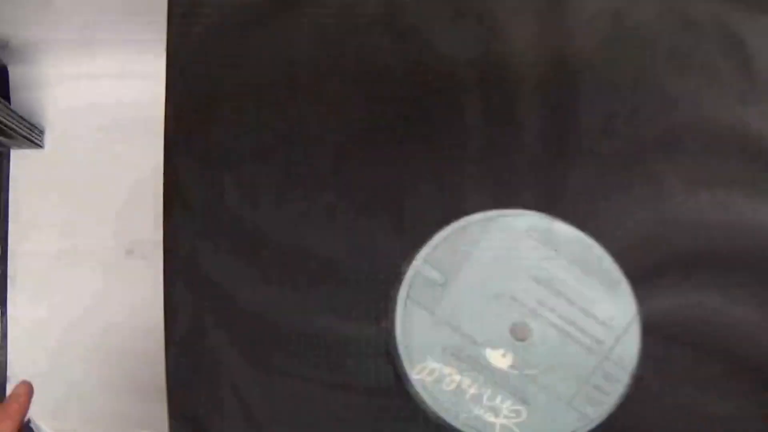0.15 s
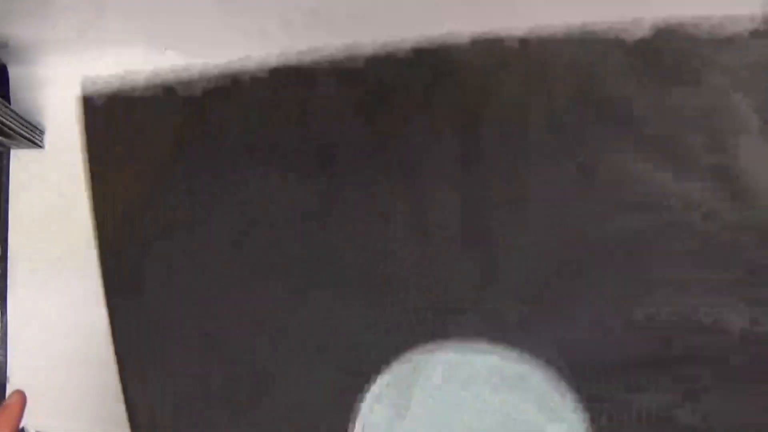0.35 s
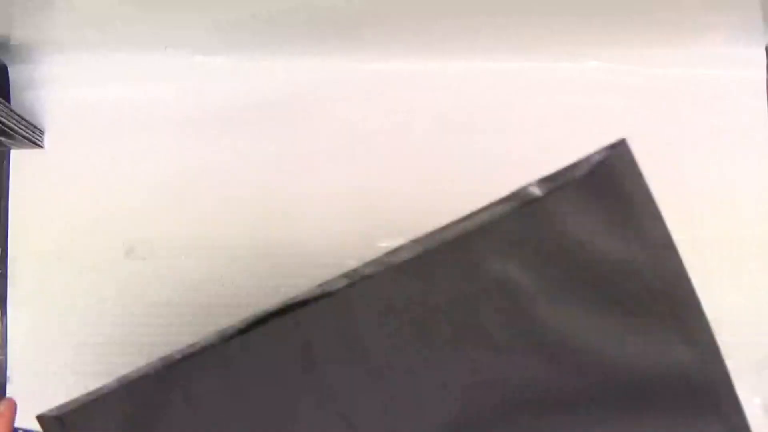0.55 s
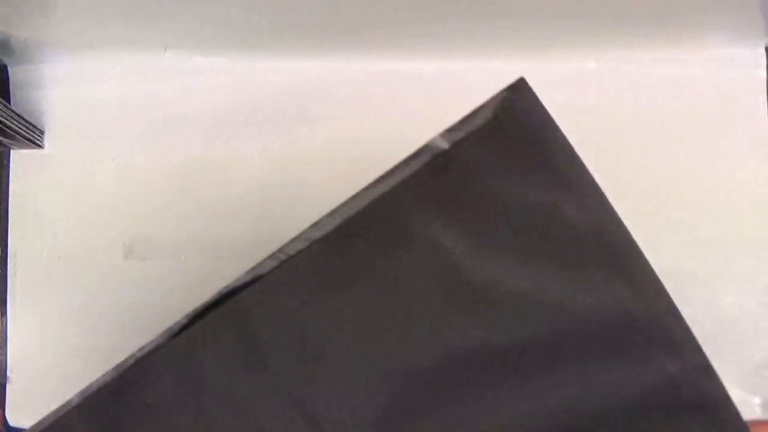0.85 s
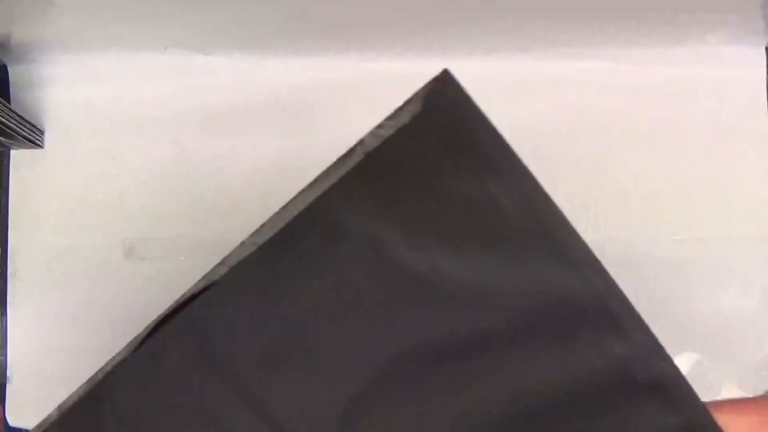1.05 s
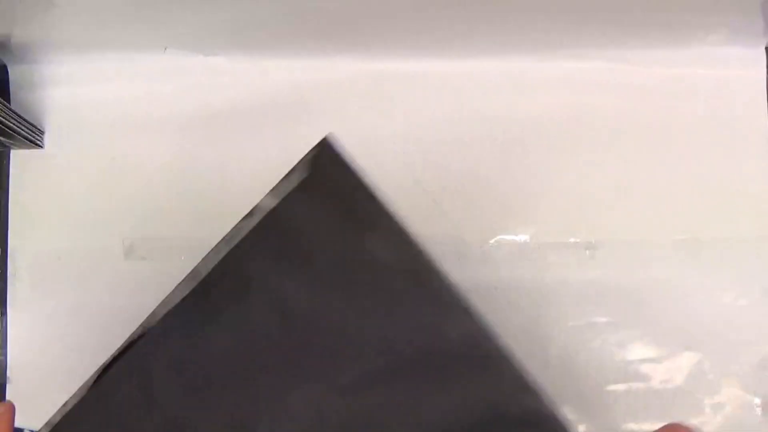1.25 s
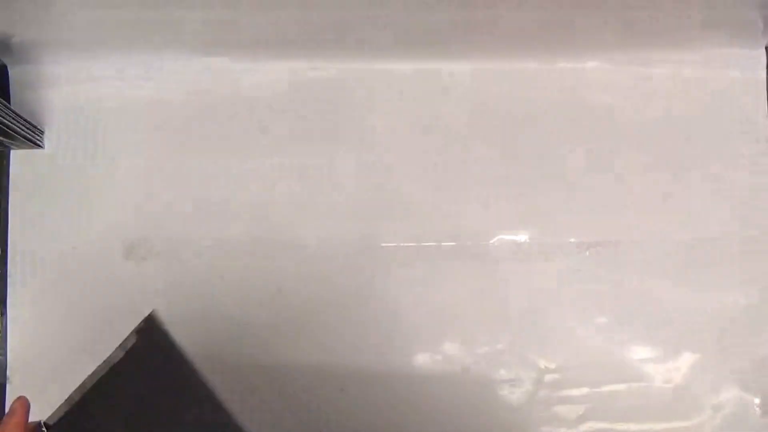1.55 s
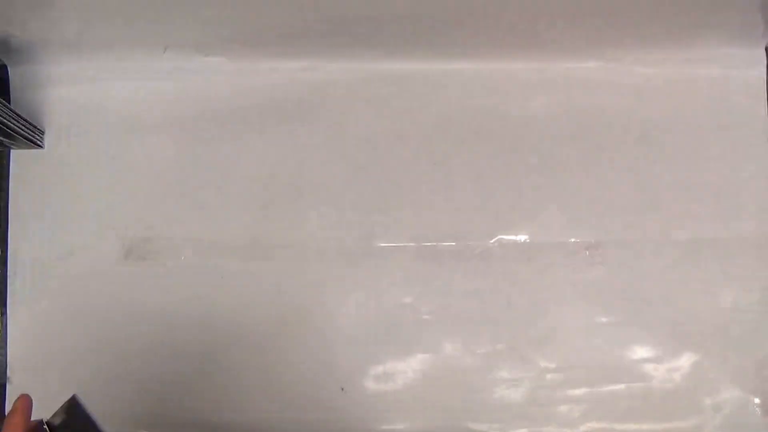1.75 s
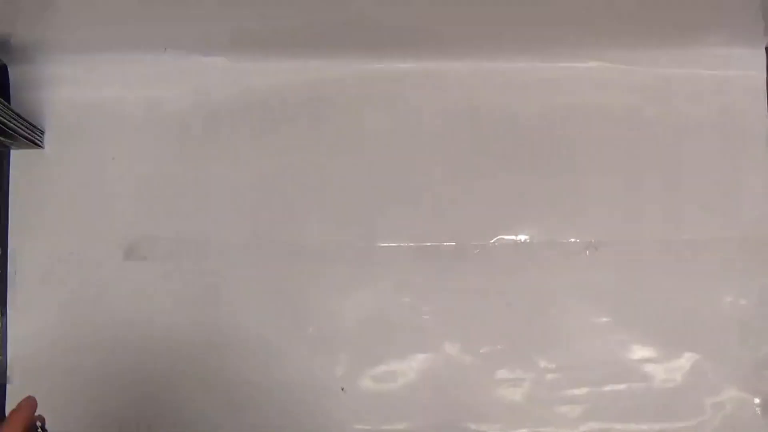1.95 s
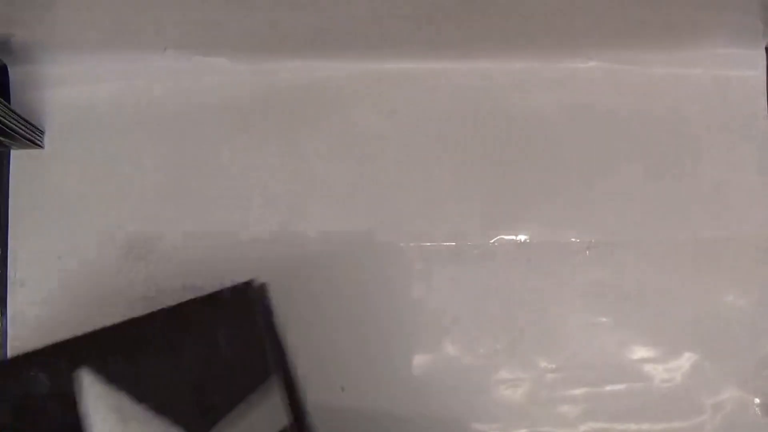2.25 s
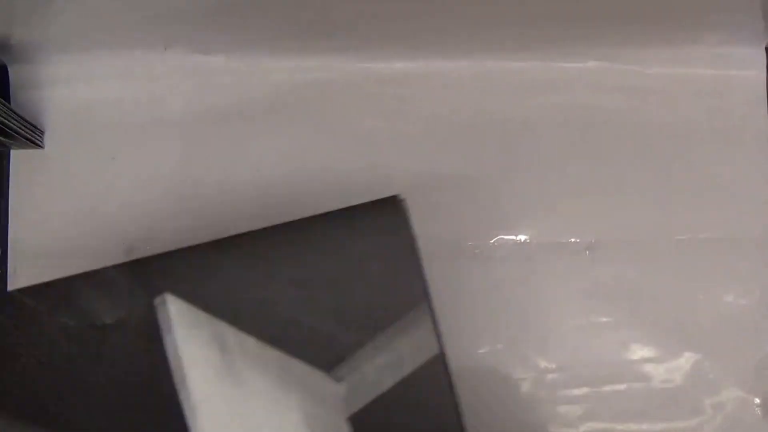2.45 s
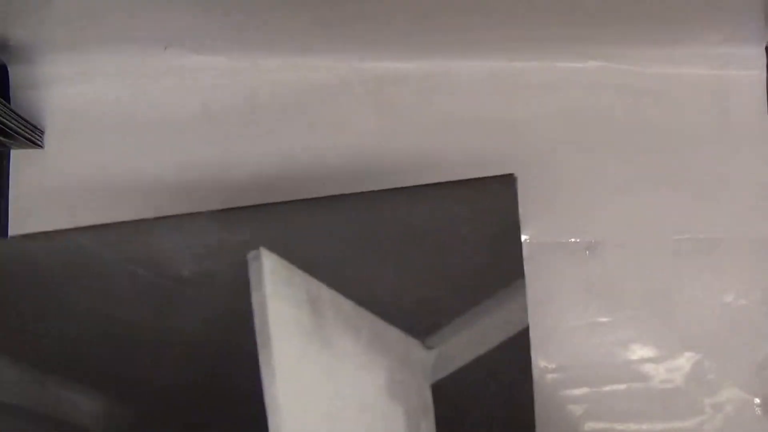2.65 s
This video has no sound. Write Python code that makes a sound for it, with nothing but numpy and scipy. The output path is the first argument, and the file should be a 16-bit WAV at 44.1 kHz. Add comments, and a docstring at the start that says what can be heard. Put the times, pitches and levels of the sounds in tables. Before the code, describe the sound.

Cardboard record sleeves handled close up in a small quiet room. A soft hollow bump and low puff of air at 0.25-0.4 s, a sharp knock with brief scuffing at 0.6 s, a dull thud near 0.75, a crisp tap at 1.05. A bright, grainy papery slide runs 1.3-1.95 s, then light taps at 2.1, 2.4 and 2.5 s fade into faint hum, hiss and tiny rapid ticking.

```python
"""Cardboard sleeves turned and slid over a table, close up: dense fibre grains ring paper, card and sleeve bands.
Scuffs are narrow noise swells; edge taps mix noise bursts with a ring; thuds are decaying low modes.
The rubbing, scuffs, taps and thuds get a short wide echo; fanned air is low noise with a slow level curve.
Beneath lie mains hum, rumble, hiss and a faint pip 25 times a second, in a quiet room."""
import sys
import numpy as np
from scipy import signal
from scipy.fft import rfft, irfft
from scipy.io import wavfile
from scipy.ndimage import uniform_filter1d, map_coordinates

SR = 44100
rng = np.random.default_rng(int(sys.argv[2]) if len(sys.argv) > 2 else 0)


def generate_wav(sig):
    """Save sig (samples, or channels by samples) to the path in sys.argv[1] as 16-bit PCM at SR."""
    pcm = np.round(np.clip(np.atleast_2d(sig).T, -1, 1) * 32767).astype(np.int16)
    wavfile.write(sys.argv[1], SR, pcm)


N = 123479


def undb(db):
    """dB to gain."""
    return 10 ** (np.asarray(db) / 20)


def unit(x):
    """Scale to rms 1."""
    return x / np.sqrt(np.mean(x ** 2))


def band(x, hz, width_hz):
    """Two-pole resonance, gain 1 at the centre."""
    b, a = signal.iirpeak(min(hz, .45 * SR), hz / width_hz, fs=SR)
    return signal.lfilter(b, a, x)


def highpass(x, hz):
    """Second-order high-pass."""
    return signal.sosfilt(signal.butter(2, hz, "high", fs=SR, output="sos"), x)


def walk(rate_hz):
    """Random levels held 1 / rate_hz s, smoothed twice; rms 1."""
    hold = int(SR / rate_hz)
    steps = np.repeat(rng.standard_normal(N // hold + 1), hold)
    slewed = uniform_filter1d(uniform_filter1d(steps, hold), hold)
    return unit(slewed[:N])


def log_interp(hz, points):
    """dB at hz from (f/Hz, dB) points, linear in log f."""
    return np.interp(np.log(hz), np.log(points[:, 0]), points[:, 1])


def coloured(points):
    """Gaussian noise shaped to (f/Hz, dB) points."""
    hz = np.maximum(np.arange(N // 2 + 1) * SR / N, 1)
    spectrum = rfft(rng.standard_normal(N)) * undb(log_interp(hz, points))
    return irfft(spectrum, N)


def add(out, x, start_s):
    """Mix x into out at start_s."""
    i = int(start_s * SR)
    out[..., i:i + x.shape[-1]] += x[..., :N - i]


# mains harmonics: f/Hz, rms level/dB
HUM_TONES = [(99.6, -54), (300, -72.5)]


def hum(t):
    """Mains harmonics with wandering phase."""
    out = 0
    for hz, rms_db in HUM_TONES:
        phase_rad = 2 * np.pi * hz * t + 0.84 * walk(7.66)
        out = out + np.sqrt(2) * undb(rms_db) * np.sin(phase_rad)
    return out


# pip level curve: t/s, level/dB
PIP_LEVEL = [(.29, -78), (.35, -60), (.45, -65), (.5, -72), (1.2, -65), (2.5, -78)]
PIP_PERIOD_S, PIP_FIRST_S, PIP_LENGTH_S = .04, 0.0345, 0.011
PIP_HZ, PIP_SCATTER_HZ, PIP_SCATTER_DB = 3260, 45, 2.5


def pips(t):
    """Regular half-sine-windowed tone bursts, each scattered in level and pitch."""
    since_s = (t - PIP_FIRST_S) % PIP_PERIOD_S
    index = ((t - PIP_FIRST_S) // PIP_PERIOD_S).astype(int)
    level, tune = rng.standard_normal((100, 2))[index].T
    gain = undb(np.interp(t, *np.array(PIP_LEVEL).T) + PIP_SCATTER_DB * level)
    window = np.sin(np.pi * np.minimum(since_s / PIP_LENGTH_S, 1))
    return gain * window * np.sin(2 * np.pi * (PIP_HZ + PIP_SCATTER_HZ * tune) * since_s)


# mid noise spectrum shape: f/Hz, relative density/dB
ROOM_SPECTRUM = [(20, -25), (54, -12.5), (104, -12), (160, -16.5), (311, -18.5), (433, -27), (1000, -32),
                 (3240, -44.5), (5000, -37), (7900, -37.5), (11000, -38.5)]
# side re mid: f/Hz, ratio/dB
ROOM_SIDE = [(270, -13.5), (570, 13.5), (1200, 2), (2600, 12.5), (5500, 2.5), (11000, -29)]
ROOM_MID_RMS_DB = -60


def room():
    """Stereo rumble and hiss: independent mid and side noise, widest in the middle bands."""
    mid_points, side_points = np.array(ROOM_SPECTRUM), np.array(ROOM_SPECTRUM)
    side_points[:, 1] += log_interp(mid_points[:, 0], np.array(ROOM_SIDE))
    mid, side = coloured(mid_points), coloured(side_points)
    return (mid + side * np.array([[1], [-1]])) * undb(ROOM_MID_RMS_DB) / np.std(mid)


# air level curve: t/s, level/dB
AIR_LEVEL = [(0.0, -78), (0.19, -63), (0.32, -37.5), (0.41, -47), (0.53, -66), (0.87, -45), (0.93, -55.5),
             (1.19, -58), (1.3, -64), (1.58, -49.5), (1.74, -59), (2.47, -57), (2.8, -84)]
AIR_HZ, AIR_PASS_WIDTH_HZ = 24, 25


def air(t):
    """Slow pressure waves from the waving sheet: low noise, short-term level evened, then shaped."""
    curve = np.array(AIR_LEVEL)
    noise = rng.standard_normal(N)
    for _ in range(2):
        noise = band(noise, AIR_HZ, AIR_PASS_WIDTH_HZ)
    power = uniform_filter1d(noise ** 2, size=SR // 24)
    even = noise / np.sqrt(power + 1e-4 * np.var(noise))
    return even * undb(np.interp(t, curve[:, 0], curve[:, 1]))


ECHO_MID_DB, ECHO_SIDE_DB, ECHO_T60_S = -20.5, -11.5, 0.14
SIDE_HZ, SIDE_WIDTH_HZ, SIDE_FLOOR_HZ = 1720, 4000, 402


def echo(near, t):
    """Table and walls: decaying noise tails for mid and side, the side band-limited."""
    tail = rng.standard_normal((2, SR // 3)) * undb(-60 * t[:SR // 3] / ECHO_T60_S)
    tail /= np.sqrt(np.sum(tail ** 2, axis=1, keepdims=True))  # unit energy
    mid, side = (signal.fftconvolve(near.mean(axis=0), h)[:N] for h in tail)
    side = highpass(undb(ECHO_SIDE_DB) * band(side, SIDE_HZ, SIDE_WIDTH_HZ), SIDE_FLOOR_HZ)
    return undb(ECHO_MID_DB) * mid + side * np.array([[1], [-1]])


# sleeve thuds: t/s, nominal level/dB, f/Hz, reference T60/s
THUD_HITS = [(0.269, -23.5, 207, 0.017), (.278, -22, 150, 0.072), (0.369, -39.5, 130.3, 0.19),
             (0.6166, -13.5, 332, 0.015), (0.629, -37, 300, 0.045), (0.649, -38, 246, 0.1),
             (0.742, -33.5, 300, 0.037), (0.762, -26, 170, 0.079), (0.786, -26.5, 114, 0.13),
             (0.826, -35.5, 143, 0.12), (1.0532, -20, 323, 0.058), (1.141, -39.5, 127, 0.18),
             (1.290, -32.5, 191, 0.069), (1.491, -39, 128, 0.22), (1.730, -36.5, 328, 0.048),
             (1.788, -39, 151, 0.089), (2.101, -25.5, 243, 0.01), (2.488, -33, 106, 0.1),
             (2.508, -38, 296, .1)]
# thud modes: ratio to f, level/dB, share of reference T60
SLEEVE_MODES = [(0.999, 1.5, 0.76), (0.493, -11, 0.95), (1.39, -9, 0.75), (2.02, -13, 0.85)]
THUD_ATTACK_CYCLES, THUD_FLOOR_HZ = .35, 55


def thuds():
    """The whole sleeve rings briefly in a few low modes, pulling inward first."""
    out, t = np.zeros(N), np.arange(SR // 4) / SR
    for start_s, db, hz, t60_s in THUD_HITS:
        ring = 0
        for ratio, mode_db, share in SLEEVE_MODES:
            decay = undb(db + mode_db - 60 * t / (t60_s * share))
            ring = ring + decay * np.sin(2 * np.pi * hz * ratio * t)
        attack = 1 - np.exp(-t * hz / THUD_ATTACK_CYCLES)
        add(out, -ring * attack, start_s)
    return highpass(out, THUD_FLOOR_HZ)


# edge taps: t/s, nominal level/dB, f/Hz, treble re mids/dB, L-R/dB, T60/s
TAP_HITS = [(0.246, -39, 1545, -7, 3, 0.11), (0.479, -44, 1240, 2, 3, 0.074),
            (0.593, -24.5, 1080, 13, -0.5, 0.068), (0.653, -34, 2200, 0, 12, 0.047),
            (1.0506, -18.5, 2980, 3, 4, 0.027), (1.724, -40, 3250, -5, 4, 0.056),
            (2.101, -28.5, 1935, 1, 1, 0.038), (2.125, -29.5, 1790, -4.5, 2, 0.078),
            (2.191, -32, 1400, -6, 4, 0.034), (2.372, -25, 1720, -11, 4.5, 0.045),
            (2.4879, -22, 1495, -29.5, 1, 0.032), (2.508, -31.5, 1700, -16, -2, .02),
            (2.521, -30.5, 1370, -9, 0, 0.039), (2.726, -39.5, 2500, -14, 0, 0.026)]
CRACK_DB, CRACK_S, TAP_ATTACK_S = 4, .003, .0004
TAP_WIDTH_RATIO, UNDERTONE_RATIO, UNDERTONE_DB = .9, 0.517, -6
RING_DB, RING_DB_PER_TREBLE_DB = -15, -.5
SNAP_HZ, SNAP_WIDTH_HZ = 10000, 4800
SNAP_T60_SHARE = 0.63  # T60 share of the snap's extra decay, on top of the tap's


def taps():
    """An edge strikes: noise around the card pitch, a ring and a treble snap; dull taps ring cleaner."""
    out, t = np.zeros((2, N)), np.arange(SR // 8) / SR
    for start_s, db, hz, treble_db, pan_db, t60_s in TAP_HITS:
        decay_db = -60 * t / max(t60_s, .005)
        crack_db = CRACK_DB * (np.exp(-(t / CRACK_S) ** 2) - 1.5)
        env = (1 - np.exp(-t / TAP_ATTACK_S)) * undb(crack_db + decay_db)
        noise = rng.standard_normal((2, len(t)))
        ring = np.sin(2 * np.pi * hz * t)
        ring += undb(UNDERTONE_DB) * np.sin(2 * np.pi * UNDERTONE_RATIO * hz * t)
        mids = .5 * unit(band(noise[0], hz, TAP_WIDTH_RATIO * hz))
        mids += undb(RING_DB + RING_DB_PER_TREBLE_DB * treble_db) * ring
        snap = .5 * undb(treble_db) * unit(band(noise[1], SNAP_HZ, SNAP_WIDTH_HZ))
        snap *= undb(decay_db / SNAP_T60_SHARE)
        gains = undb(db + np.array([[pan_db], [-pan_db]]) / 2)
        add(out, (mids + snap) * env * gains, start_s)
    return out


# short singing catches: t/s, level before swell/dB, f/Hz, length/s
SCUFF_CATCHES = [(.644, -41.5, 7600, 0.0069), (.693, -42, 8800, 0.011), (0.71, -41.5, 7400, .006),
                 (0.715, -44, 8300, 0.02), (1.0685, -39, 7600, 0.003), (1.31, -43, 6160, 0.016),
                 (1.324, -34.5, 7470, 0.022), (1.41, -38, 5140, .035), (1.59, -50, 425, 0.062),
                 (1.843, -48.5, 1400, 0.033)]
SCUFF_WIDTH_RATIO = 0.1  # first pass; second is twice as wide


def scuffs():
    """Each catch swells quickly and fades, grainy, in its own narrow band."""
    out = np.zeros(N)
    for start_s, db, hz, length_s in SCUFF_CATCHES:
        grain = rng.standard_normal(SR // 8) ** 3  # cubed: sparse peaks
        progress = np.minimum(np.arange(len(grain)) / SR / length_s, 1)
        narrow = band(grain, hz, SCUFF_WIDTH_RATIO * hz)
        narrow = unit(band(narrow, hz, 2 * SCUFF_WIDTH_RATIO * hz))
        swell = np.sin(np.pi * np.sqrt(progress))
        add(out, narrow * swell * undb(db), start_s)
    return out


DRIFT_RMS_RATIO, DRIFT_PER_S = .07, 14


def drift(x):
    """Read at an uneven speed: resonances wander in pitch as the contact moves."""
    position = np.cumsum(1 + DRIFT_RMS_RATIO * walk(DRIFT_PER_S))
    return map_coordinates(x, [position], mode="mirror")


# rubbing curves: t/s, fibre level/dB, card re fibres/dB, sleeve re fibres/dB
RUB_LEVELS = [(0, -58.5, -1, -6.5), (.228, -66.5, 7, -1), (0.235, -48, -7, 0), (0.244, -45, -21, 2),
              (0.251, -63.5, -2, 11), (.47, -87.5, 18, 19.5), (0.485, -56.5, -4.5, 6), (0.568, -67, -2, 0),
              (.578, -35.5, -12, -6), (0.597, -35.5, -7.5, -13), (0.62, -33, -12, 6),
              (0.629, -49.5, -9, 13), (.642, -53.5, -2, 7), (.652, -47.5, 1.5, 2.5), (0.685, -48, -7, -8),
              (0.732, -46, -8, -10), (.742, -57.5, -3, 7.5), (.85, -53.5, -3.5, -2.5), (.89, -53.5, -6, -3),
              (.97, -50.5, -8.5, -11.5), (1.045, -66.5, 1, 10.5), (1.056, -50, 9, 7),
              (1.08, -51.5, -8, 3.5), (1.17, -62.5, 0.5, -9), (1.18, -51, -13, -7.5),
              (1.288, -43, -9.5, -10.5), (1.324, -30, -20, -24), (1.35, -33.5, -13, -22.5),
              (1.43, -32, -13, -20), (1.447, -37.5, -8, -6.5), (1.55, -32.5, -17.5, -21),
              (1.62, -35, -9, -11), (1.69, -33, -15.5, -27), (1.745, -32.5, -9.5, -17),
              (1.89, -34, -11, -21), (1.95, -41, -1.5, -13.5), (2.02, -47.5, 1, -11), (2.08, -55, 0, -1),
              (2.199, -51.5, -1, -0.5), (2.23, -58.5, -4, -1), (2.368, -56.5, -2, -4.5),
              (2.379, -45, -3, 2), (2.431, -54.5, -1, -2), (2.46, -45, -3.5, -21), (2.484, -42, 1, -3),
              (2.499, -57, 1.5, 9.5), (2.58, -52.5, 0, -8.5), (2.63, -66.5, 3, -1), (2.8, -70.5, 5, 5.5)]
# resonances of fibres, card, sleeve: f/Hz, width before PASS_WIDEN/Hz, relative level/dB
FIBRE_BANDS = [(5050, 4160, -3), (7560, 2060, 1.5), (9230, 1500, -2), (9830, 450, 0)]
CARD_BANDS = [(740, 320, -6.5), (1330, 410, 1), (2134, 550, 2.5), (2690, 720, 1.5), (4090, 1730, 2.5)]
SLEEVE_BANDS = [(155, 155, 1), (322.5, 57, 0), (437, 87, -7), (618, 500, -0.5)]
PASS_WIDEN = 1.85  # each of two filter passes
GRAINS_PER_S, GRAIN_MEAN_DB, GRAIN_TOP_DB = 9000, 2.5, 9  # rate per resonance; mean before the cap
FLICKER_RMS_DB, FLICKER_PER_S, PATCH_RMS_DB, PATCH_PER_S = 1.5, 60, 1.1, 18
SURGE_RMS_DB, SURGE_PER_S = .8, 160


def fibre_catches():
    """Random-sign impulses, exponentially spread in dB up to a cap."""
    hit, sign, size = rng.random((3, N))
    size_db = np.minimum(-GRAIN_MEAN_DB * np.log(size + 1e-9), GRAIN_TOP_DB)
    return (hit < GRAINS_PER_S / SR) * np.sign(sign - .5) * undb(size_db)


def rubbing(t):
    """Dense uneven fibre catches ring each resonance, which flickers and wanders on its own."""
    curve_s, fibre_db, card_db, sleeve_db = np.array(RUB_LEVELS).T
    surge_db = SURGE_RMS_DB * walk(SURGE_PER_S)
    bodies = ((FIBRE_BANDS, fibre_db), (CARD_BANDS, fibre_db + card_db), (SLEEVE_BANDS, fibre_db + sleeve_db))
    out = 0
    for bands, level_db in bodies:
        layer = 0
        for hz, width_hz, band_db in bands:
            ringing = fibre_catches()
            for _ in range(2):
                ringing = band(ringing, hz, PASS_WIDEN * width_hz)
            flicker_db = FLICKER_RMS_DB * walk(FLICKER_PER_S) + PATCH_RMS_DB * walk(PATCH_PER_S)
            layer = layer + unit(drift(ringing)) * undb(band_db + flicker_db)
        out = out + unit(layer) * undb(np.interp(t, curve_s, level_db) + surge_db)
    return out


def scene():
    """Rubbing and scuffs a little left of centre, taps panned, thuds central, all echoed; then the background."""
    t = np.arange(N) / SR
    lean = undb(np.array([[0.4], [-0.4]]) / 2)  # L-R 0.4 dB
    near = (rubbing(t) + scuffs()) * lean + taps() + thuds()
    return near + echo(near, t) + air(t) + hum(t) + pips(t) + room()


TOP_HZ = 11080


def record(dry):
    """The camera cuts the top steeply: elliptic low-pass."""
    return signal.sosfilt(signal.ellip(12, .2, 60, TOP_HZ, fs=SR, output="sos"), dry)


dry = scene()
out = record(dry)
generate_wav(out)
```